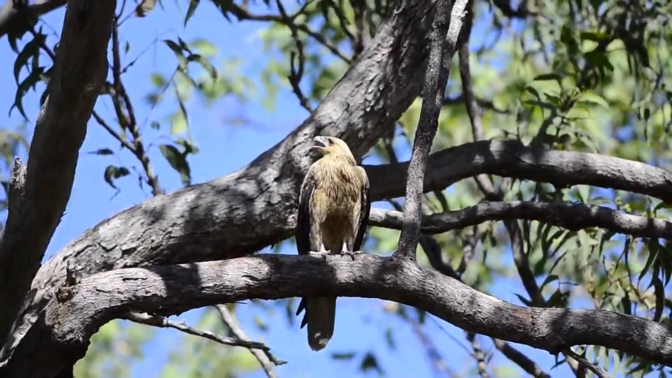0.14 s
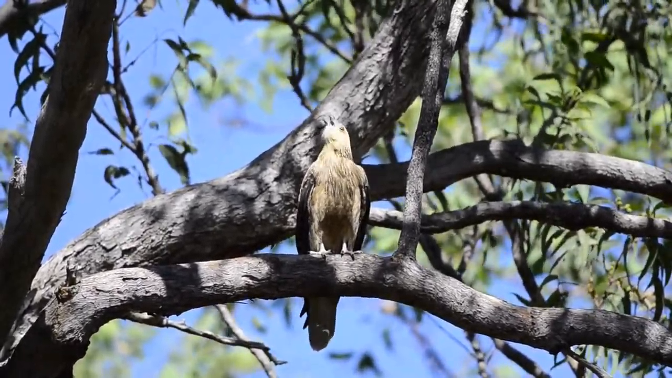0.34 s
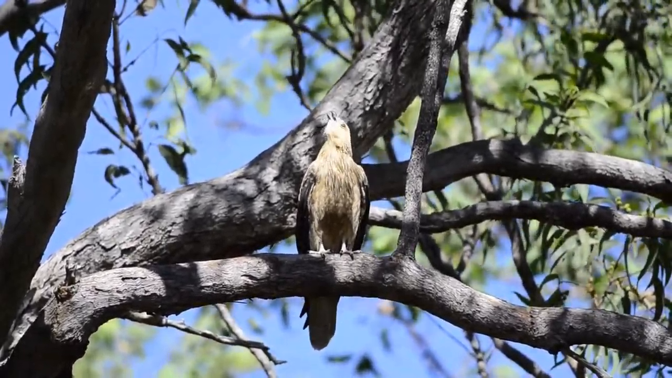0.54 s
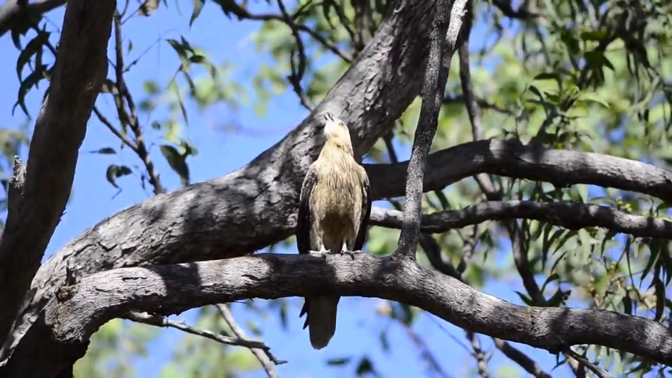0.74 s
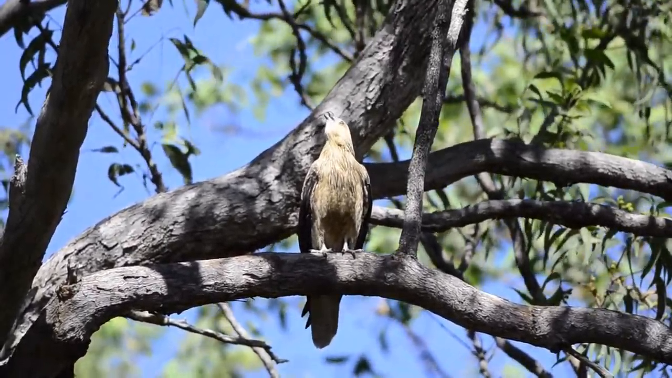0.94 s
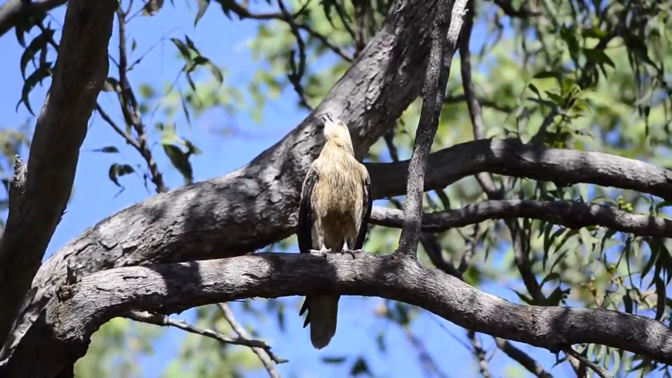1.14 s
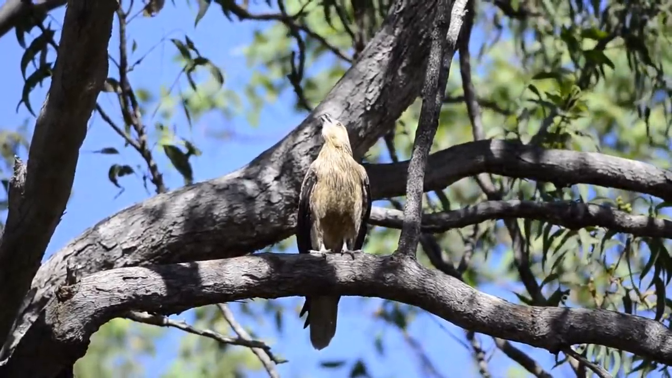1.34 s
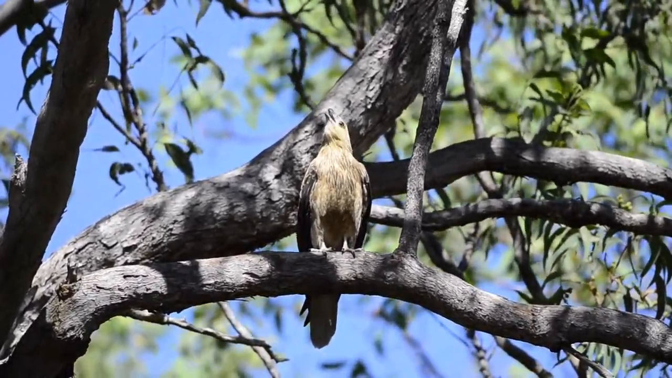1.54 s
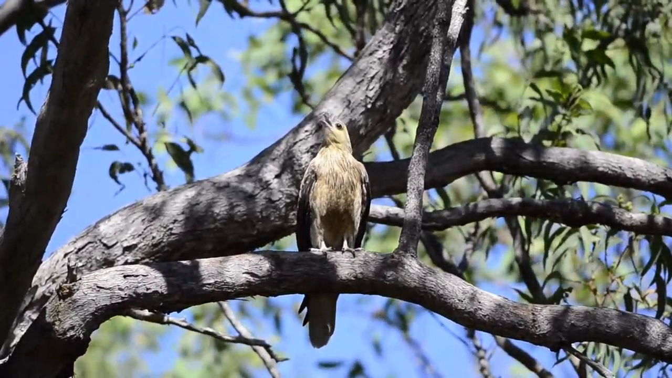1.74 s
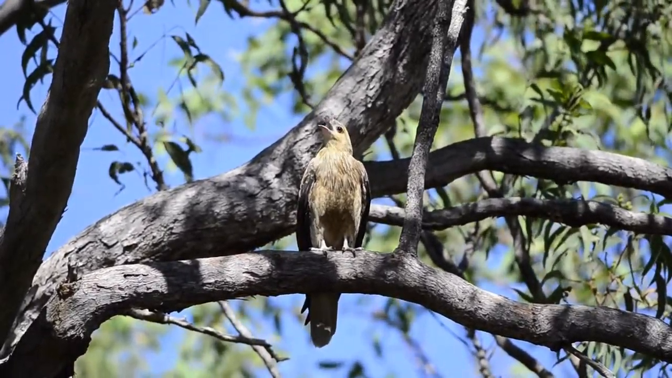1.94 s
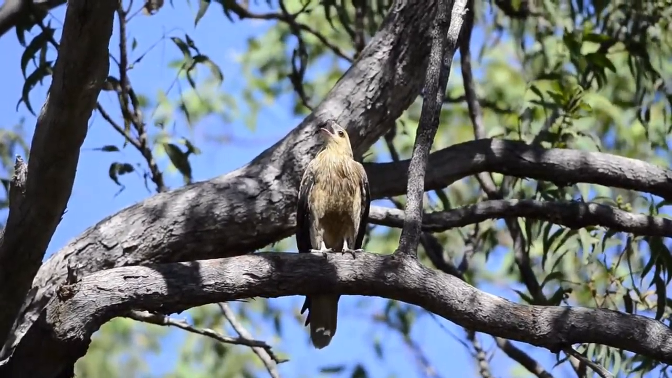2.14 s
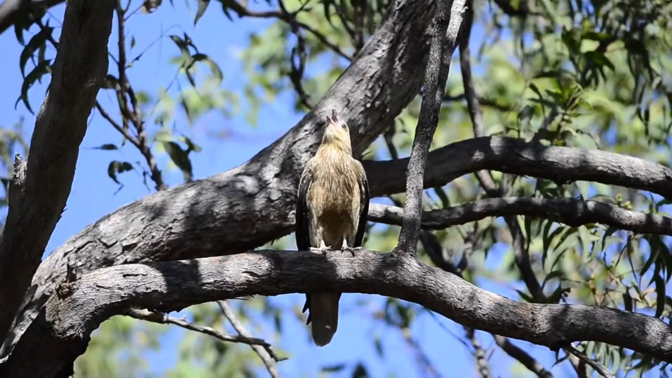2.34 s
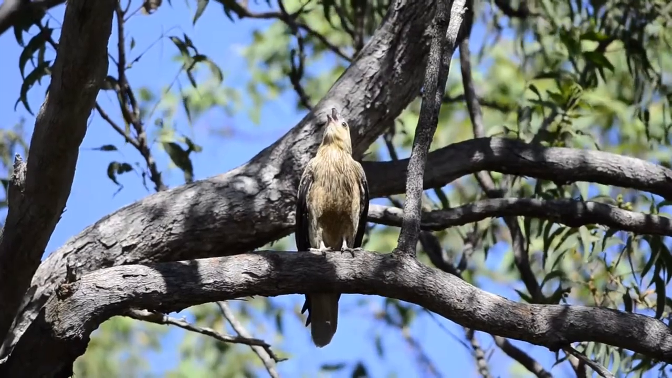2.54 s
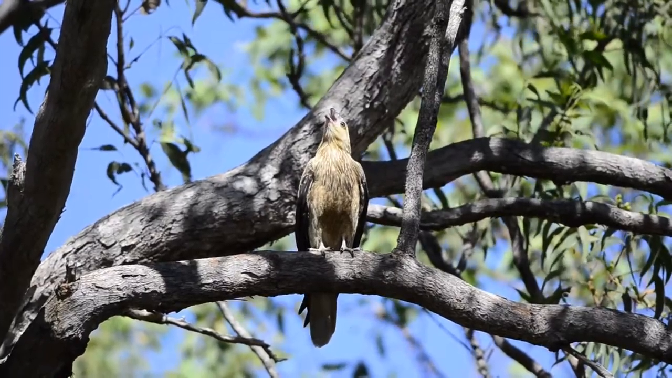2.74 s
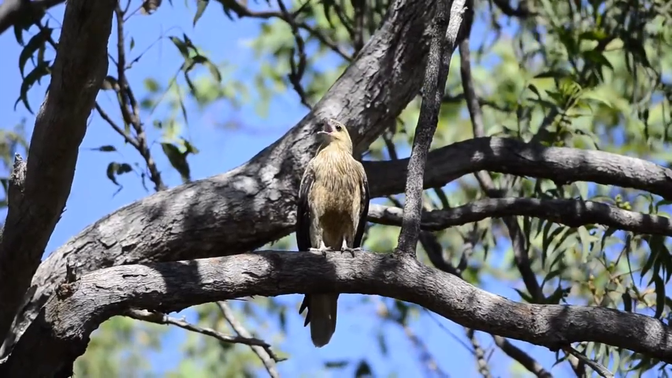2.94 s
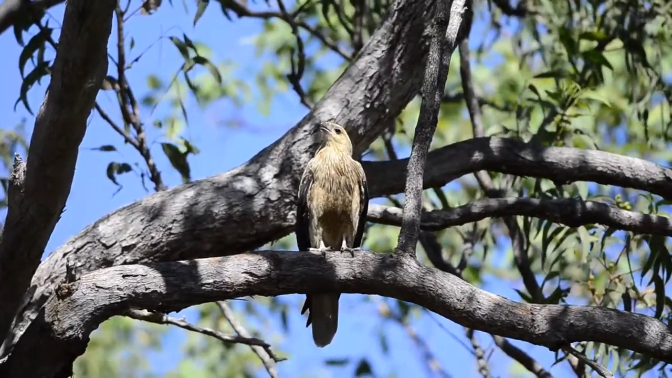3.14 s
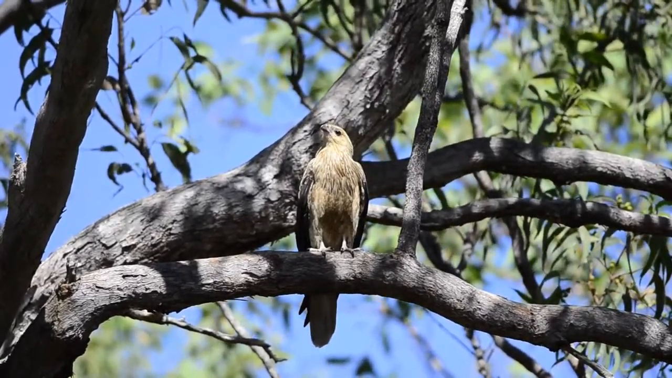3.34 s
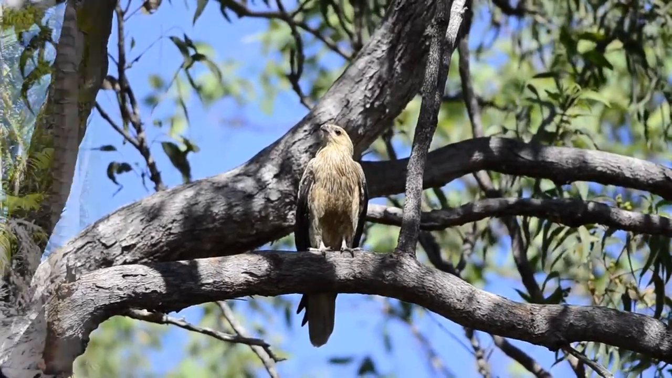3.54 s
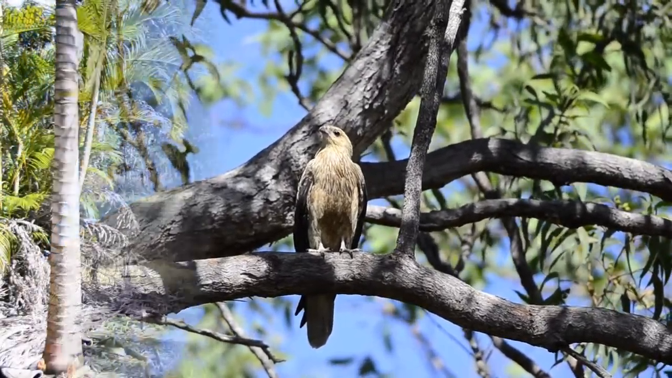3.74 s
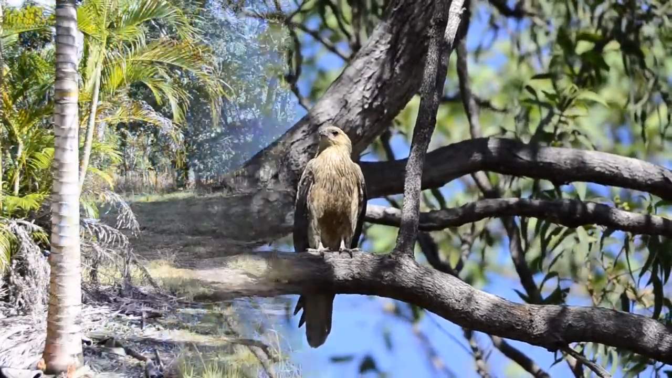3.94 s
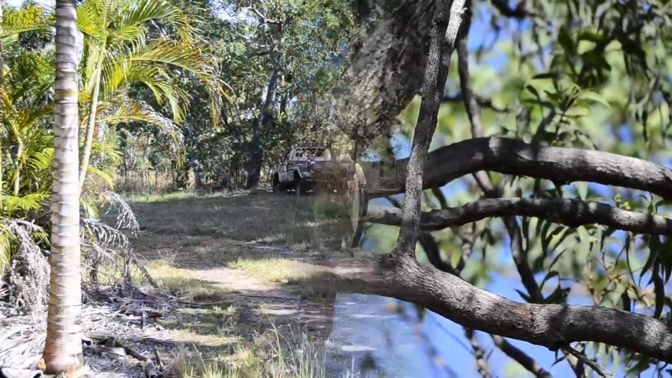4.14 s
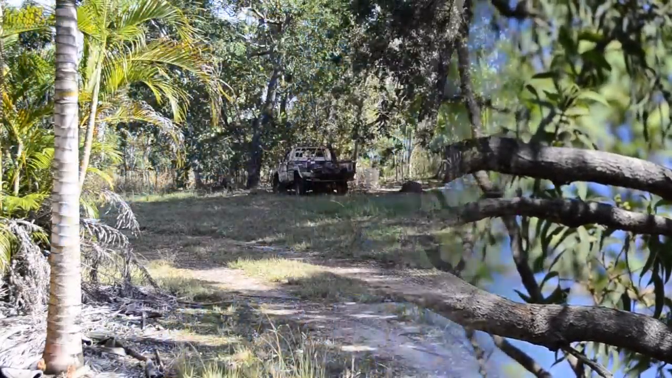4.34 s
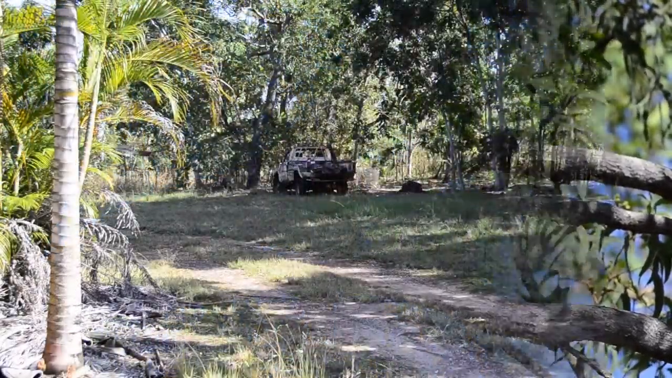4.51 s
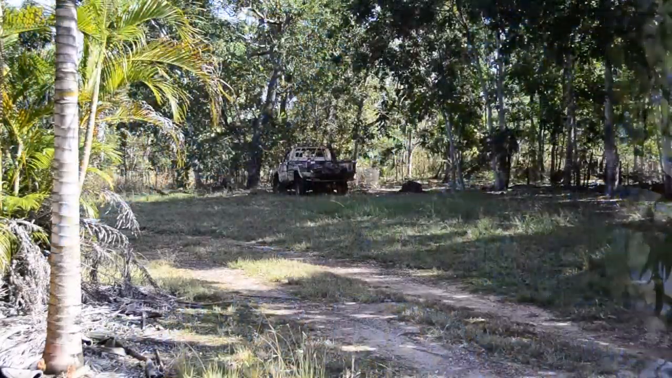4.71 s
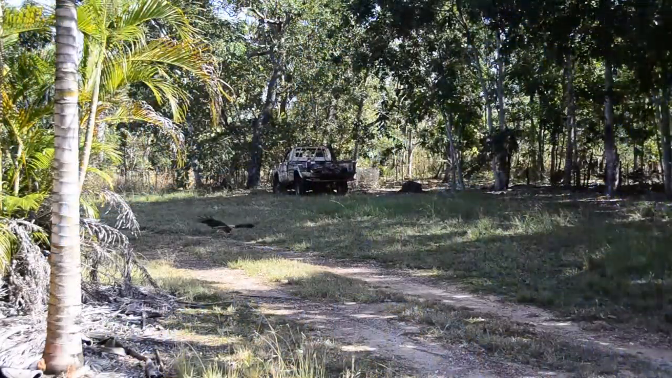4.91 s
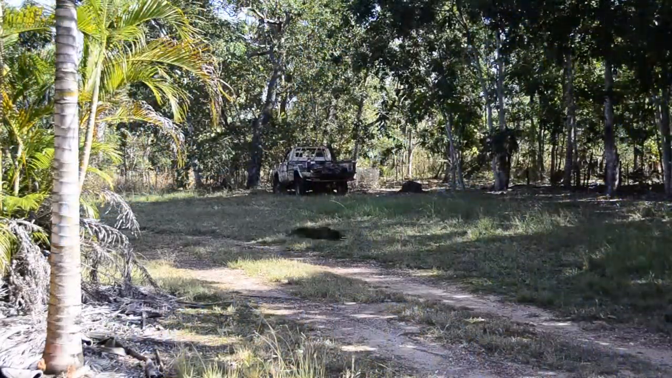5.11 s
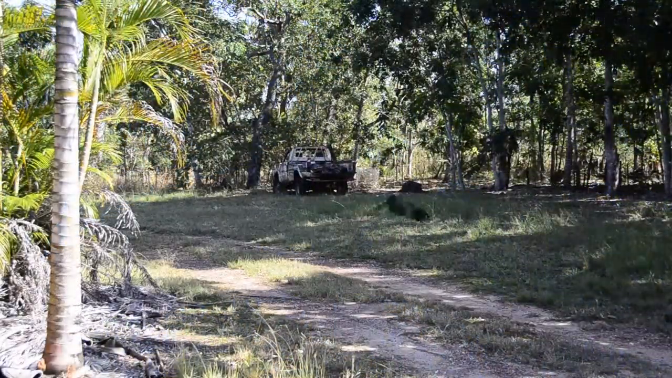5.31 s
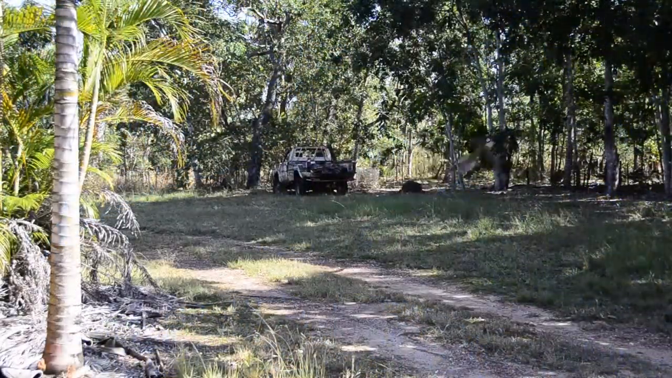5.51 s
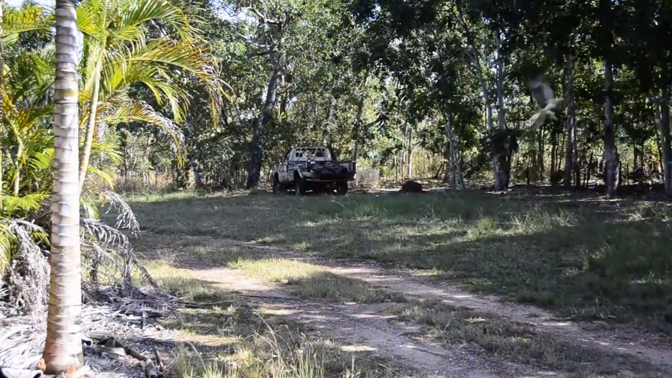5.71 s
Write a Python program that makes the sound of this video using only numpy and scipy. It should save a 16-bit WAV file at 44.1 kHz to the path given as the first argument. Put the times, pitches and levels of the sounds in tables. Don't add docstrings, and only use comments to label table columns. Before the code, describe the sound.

A quiet outdoor bush setting: soft, dull leaf rush, a barely noticeable distant engine hum and a thin high cicada buzz throbbing about seven times a second. At 0.24 s a kite calls loudly, leaping to a piercing peak, sliding down, then dropping at 0.63 s into a lower held note that fades by 1 s. From 1.2 to 2.2 s come seven short notes: two low hoots, three rough chirps that crack upward, and two higher arched notes. At 2.25 s a second, shorter falling whistle, raspier, leads into four quick climbing, breaking notes from 2.67 s and a sharp closing chip near 3.1 s. Trees answer with a short scattered echo. Then the bush is calm: a faint high peep at 3.8 s, a longer one at 5 s, twig ticks and rustle from 5.1 s, a stronger snap at 5.37 s, soft wing swishes at 5.3, 5.5 and 5.75 s, and a low faint coo near 5.6 s.

```python
import sys
import numpy as np
from scipy import signal
from scipy.fft import rfft, irfft, next_fast_len
from scipy.io import wavfile
from scipy.ndimage import uniform_filter1d, map_coordinates

SR = 44100
rng = np.random.default_rng(int(sys.argv[2]) if len(sys.argv) > 2 else 0)


def materialize(psi):
    bounded = np.clip(np.atleast_2d(psi).T, -1, 1)
    quanta = np.round(bounded * 32767).astype(np.int16)
    wavfile.write(sys.argv[1], SR, quanta)


def gain_from_decibels(decibels):
    exponent = np.asarray(decibels, float) / 20
    return 10 ** exponent


N = 254456
T = np.arange(N) / SR


def unit(x):
    return x / np.sqrt(np.mean(x ** 2) + 1e-20)


def along(points, hz):
    f, v = np.transpose(points)
    return np.interp(np.log(hz + 1), np.log(f + 1), v)


def curves(rows, t=T):
    s, *cols = np.transpose(rows)
    return [np.interp(t, s, c) for c in cols]


def wobble(rate):
    knots = rng.standard_normal(int(N * rate / SR) + 4)
    return unit(map_coordinates(knots, [T * rate]))


def filtered(x, response):
    m = next_fast_len(len(x) + 8192)
    gain = response(np.fft.rfftfreq(m, 1 / SR))
    return irfft(rfft(x, m) * gain, m)[:len(x)]


def hump(n, hz, width_hz):
    noise = rng.standard_normal(n)
    return unit(filtered(noise, lambda f: 1 / (1 + ((f - hz) / width_hz) ** 2) ** 2))


# [t/s, level/dB]
BUSH_LEVEL = [(0.0, -59), (1.7, -59), (3.26, -58), (4.56, -61.5), (4.82, -61.5), (5.77, -63)]
# [t/s, level/dB]
LEAF_LULL = [(4.88, 4.5), (4.92, 1), (5.08, 4.5), (5.09, 4)]
# [f/Hz, level/dB per Hz]
RUSH_COLOUR = [(15, -53), (25, -16), (79, -4.5), (133, -5), (359, -2.5), (457, -3.5), (666, -2.5),
               (1340, -7), (2560, -9), (5010, -17.5), (5730, -22), (7300, -9.5), (8130, -23),
               (12200, -38.5), (15500, -62)]
# [f/Hz, width/Hz, level/dB]
ENGINE_LINES = [(88, 4.7, -73), (370.5, 19, -67.5)]


def bush():
    rush = unit(filtered(rng.standard_normal(N), lambda f: gain_from_decibels(along(RUSH_COLOUR, f))))
    hum = sum(gain_from_decibels(db + 1.5 * wobble(3)) * hump(N, hz, width) for hz, width, db in ENGINE_LINES)
    swell = gain_from_decibels(curves(BUSH_LEVEL)[0] + 0.97 * wobble(3.0))
    return swell * (gain_from_decibels(-1.93 + curves(LEAF_LULL)[0]) * rush + gain_from_decibels(57) * hum)


# [t/s, level/dB]
CHORUS_LEVEL = [(0.0, -66.5), (5.77, -73)]


def cicadas():
    cycle = 2 * np.pi * 7.27 * (T - 4.25) + .15 * wobble(1.5)
    chorus = gain_from_decibels(-9) * hump(N, 7350, 450)
    # f/Hz, width/Hz, lead/rad
    for hz, width_hz, lead in [(7600, 240, .45), (7230, 280, -.4)]:
        throb = (.5 + .5 * np.cos(cycle + lead)) ** 2.2
        chorus += gain_from_decibels(3 + 1.8 * wobble(5)) * throb * hump(N, hz, width_hz)
    return gain_from_decibels(curves(CHORUS_LEVEL)[0]) * chorus


# [t/s, length/s, level/dB, centre f/Hz]
PUFFS = [(0.24, 0.011, -35.5, 3300), (0.979, 0.065, -45.5, 2200), (1.221, 0.03, -37.5, 2137),
         (1.39, 0.019, -40, 2300), (1.578, 0.0083, -39, 2400), (1.597, 0.042, -51.5, 2500),
         (1.743, 0.034, -42.5, 2200), (1.788, 0.013, -53.5, 2400), (1.905, 0.046, -40.5, 2400),
         (1.945, 0.058, -46, 2600), (2.037, 0.025, -41, 2800), (2.163, 0.0061, -32.5, 2800),
         (2.244, 0.018, -37, 3000), (2.755, 0.0063, -37, 2200), (2.867, 0.012, -37.5, 2600),
         (2.963, 0.042, -41, 2600), (3.071, 0.0065, -33.5, 2600), (3.158, 0.032, -42, 2400)]


def rasps():
    out = np.zeros(N)
    for s, length, db, hz in PUFFS:
        n = round(length * SR)
        puff = hump(n, hz, 740)
        puff = puff + gain_from_decibels(-17.0) * hump(n, 1.47 * hz, 1200)
        puff = puff + gain_from_decibels(-30.5) * hump(n, 3.67 * hz, 1400)
        swell = np.sin(np.pi * (np.arange(n) / n) ** .7) ** .6
        out[round(s * SR):][:n] += gain_from_decibels(db) * puff * swell
    return out


# [t/s, pitch f/Hz, level/dB, second membrane level/dB]
LONG_NOTES = [
    ("lead", [(0.242, 2170, -51.5, 3.5), (0.25, 2726, -38, -15.5), (0.262, 2985, -23.5, -42), (0.281, 3214, -24, -18.5)]),
    ("fall", [(0.281, 3552, -17.5, -32), (0.295, 3382, -22, -28.5), (0.31, 3083, -27, -30), (0.327, 2780, -28, -14), (0.345, 2640, -33, -20.5), (0.41, 2385, -31.5, -41.5), (0.5, 2267, -35, -43), (0.57, 2130, -28, -35), (0.627, 2038, -36, -18.5)]),
    ("hold", [(0.628, 1694, -40, -14), (0.66, 1654, -34.5, -31), (0.72, 1658, -36, -20.5), (0.8, 1632, -35.5, -24.5), (0.88, 1618, -34, -22), (1.0, 1585, -47.5, -10)]),
              ("lead", [(2.25, 2406, -45.5, -27), (2.26, 2656, -28, -23), (2.272, 2740, -31.5, -22)]),
    ("split", [(2.272, 3296, -24.5, -17), (2.288, 3155, -20.5, -25), (2.31, 2860, -27.5, -23), (2.34, 2773, -33, -15.5), (2.4, 2616, -26.5, -27.5), (2.47, 2512, -35.5, -21.5), (2.53, 2528, -32, -20.5), (2.59, 2508, -33.5, -21), (2.666, 2270, -32, -16.5)]),
]
# [t/s, pitch f/Hz, level/dB, second membrane level/dB]
CLOSING_NOTE = [
    ("arch", [(3.068, 2304, -32, -24), (3.078, 2568, -31.5, -38), (3.092, 2655, -27.5, -45), (3.103, 2400, -37.5, -30), (3.116, 2060, -34.5, -16)]),
]


def long_whistles():
    for voice, rows in LONG_NOTES + CLOSING_NOTE:
        cut = span(rows[0][0], rows[-1][0])[0]
        yield (voice, cut, *curves(rows, T[cut]))


CATCH_DB, CATCH_S = -12, 0.0053
CALM_DB = -45


def span(start, end):
    cut = slice(round(start * SR), round(end * SR))
    u = (T[cut] - start) / (end - start)
    return cut, u, np.exp(-np.minimum(u, 1 - u) * (end - start) / CATCH_S)


# [start t/s, end t/s, first f/Hz, top f/Hz, level/dB]
ARCHED = [
    (1.235, 1.313, 1690, 1807, -31.5),
    (1.406, 1.479, 1710, 1848, -31),
    (2.05, 2.112, 2117, 2256, -29),
    (2.165, 2.224, 2295, 2562, -28),
]


def arched_notes():
    for start, end, first_hz, top_hz, db in ARCHED:
        cut, u, catch = span(start, end)
        voice, top = ("hoot", .47) if top_hz < 2000 else ("arch", 0.345)
        up, down = np.clip(1 - u / top, 0, 1), np.clip((u - top) / (1 - top), 0, 1)
        hz = top_hz - (top_hz - first_hz) * (up ** 2.0 + 1.88 * down ** 1.5)
        level_db = db + np.interp(u, [0, 0.54, 1], [-8.5, 0, -10])
        yield voice, cut, hz, level_db, CALM_DB + (CATCH_DB - CALM_DB) * catch


# [start t/s, break t/s, first f/Hz, last f/Hz, level at break/dB]
CLIMBING = [(1.587, 1.612, 1762, 1962, -24.5), (1.749, 1.772, 1810, 2076, -27.5),
            (1.909, 1.928, 1975, 2193, -25), (2.667, 2.695, 1788, 2184, -27.5),
            (2.771, 2.791, 1865, 2237, -26.5), (2.87, 2.896, 1986, 2495, -26),
            (2.968, 2.995, 2130, 2686, -24)]
# [end t/s, first f/Hz, last f/Hz, level/dB, second membrane level/dB]
AFTER_BREAK = [(1.669, 2269, 2012, -31.5, -7.5), (1.836, 2432, 2250, -32, -7),
               (1.986, 2572, 2415, -29, -16), (2.742, 2435, 2405, -37, -16),
               (2.834, 2523, 2366, -35.5, -24.5), (2.931, 2726, 2380, -33, -20),
               (3.03, 2986, 2610, -28.5, -27.5)]


def climbing_notes():
    for climb, after in zip(CLIMBING, AFTER_BREAK):
        start, snap, first_hz, last_hz, db = climb
        end, high_hz, low_hz, high_db, second_db = after

        cut, u, catch = span(start, snap)
        bend = (2038 / first_hz) ** 5
        hz = first_hz + (last_hz - first_hz) * np.abs(u) ** bend
        level_db = db - 18.5 * np.abs(1 - u) ** 0.91
        yield "climb", cut, hz, level_db, CALM_DB + (CATCH_DB - CALM_DB) * catch

        cut, u, catch = span(snap, end)
        hz = high_hz + (low_hz - high_hz) * np.abs(u) ** 2.1
        voice, jolt_db = ("rough", -4.5) if snap < 2.0 else ("broken", 3.5)
        level_db = high_db - 6 * u + jolt_db * np.exp(-u * (end - snap) / 0.0079)
        yield voice, cut, hz, level_db, second_db + (CATCH_DB - second_db) * catch


def stretches():
    yield from long_whistles()
    yield from arched_notes()
    yield from climbing_notes()


PRESSED_VOICES = ["fall", "split", "rough", "broken"]
# [f/Hz, level/dB]
OCTAVE_OPEN = [(3300, -17.5), (3700, -17), (4400, -9), (5100, -8), (6000, -11), (6500, -14.5)]
OCTAVE_PRESSED = [(4200, -40), (4700, -35), (5400, -32.5), (5900, -22.5), (6400, -18.5), (7000, -19.5)]
# [f/Hz, level/dB]
THIRD_OVERTONE = [(4900, -34.5), (5500, -33), (6300, -26.5), (6800, -14.5), (7700, -21.5), (8800, -26),
                  (9800, -41), (10600, -53)]
# [f/Hz, level/dB]
UPPER_OVERTONES = [(5000, -35), (6500, -16), (8500, -29), (10500, -39), (12500, -61.5), (15000, -79.5)]
EVEN_OVERTONES = {"fall": -21, "split": -3, "rough": 0, "broken": 0, "hold": -4}
WEARING_DULL = {"arch": -9, "hoot": -7, "climb": -14, "broken": -11.5, "rough": -8.5}


def overtone_levels(voice, v, hz, db1, bright_db):
    worn = np.arange(len(hz)) / len(hz)
    dim_db = WEARING_DULL.get(voice, 0) * worn ** 2
    octave = OCTAVE_PRESSED if voice in PRESSED_VOICES else OCTAVE_OPEN
    levels = [db1,
              dim_db + db1 + v["octave_db"] + along(octave, 2 * hz),
              dim_db + db1 + v["twelfth_db"] + along(THIRD_OVERTONE, 3 * hz)]
    for k in (4, 5, 6, 7):
        db = db1 + dim_db + v["upper_db"] + bright_db + along(UPPER_OVERTONES, k * hz)
        if k % 2 == 0:
            db = db + EVEN_OVERTONES.get(voice, 0)
        levels.append(db - 90 * (k * hz > 16000))
    return levels


def membrane_lines(k, phase, beat, second_db, v):
    sum_share = 0 if k == 1 else (2 / k) ** 1.1
    below_db = np.minimum(second_db + sum_share * v["sum_db"], 8)
    above_db = second_db + v["mirror_db"] + (k > 2) * 0.25 * v["sum_db"]
    mixed = gain_from_decibels(below_db) * np.sin(phase - beat) + gain_from_decibels(above_db) * np.sin(phase + beat)
    second_order = np.sin(phase - 2 * beat) + gain_from_decibels(-3) * (k == 1) * np.sin(phase - 3 * beat)
    return mixed + gain_from_decibels(below_db + second_db - 1.5) * second_order


REGISTERS = { "lead": dict(octave_db=2, twelfth_db=3, upper_db=-3, mirror_db=-4.5, sum_db=4, loose=0.059, hoarse=.12, stack=.05),
             "fall": dict(octave_db=0, twelfth_db=-1, upper_db=1, mirror_db=-4.5, sum_db=-1.5, loose=0.022, hoarse=0.067, stack=.01),
             "hold": dict(octave_db=-2, twelfth_db=-4, upper_db=.5, mirror_db=-16, sum_db=-0.5, loose=0.061, hoarse=.02, stack=0.014),
             "split": dict(octave_db=4, twelfth_db=-2.5, upper_db=-1, mirror_db=-5, sum_db=18.5, loose=0.025, hoarse=0.12, stack=.05),
             "arch": dict(octave_db=3, twelfth_db=7, upper_db=-5.5, mirror_db=-3.5, sum_db=0.5, loose=0.13, hoarse=0.046, stack=.03),
             "hoot": dict(octave_db=5, twelfth_db=2, upper_db=-2.5, mirror_db=2, sum_db=1.5, loose=.12, hoarse=.05, stack=.02),
             "climb": dict(octave_db=5, twelfth_db=4.5, upper_db=-1.5, mirror_db=-5.5, sum_db=4, loose=0.019, hoarse=0.12, stack=0.036),
             "rough": dict(octave_db=10, twelfth_db=-9, upper_db=-0.5, mirror_db=-6.5, sum_db=24.5, loose=0.058, hoarse=0.1, stack=0.27),
             "broken": dict(octave_db=10, twelfth_db=-4, upper_db=1.5, mirror_db=-8, sum_db=20, loose=0.14, hoarse=0.23, stack=0.091),
             }
# [t/s, brightness level/dB]
BEAK_GAPE = [(.25, -2.5), (.33, 8), (.62, -15.5), (.64, -18), (1.0, -9), (1.25, -1.5), (1.6, -0.5),
             (1.8, 5), (1.95, 5.5), (2.07, 0), (2.2, 3), (2.27, -4.5), (2.45, 3), (2.65, 5), (2.9, 3.5),
             (3.1, 11)]
CYCLE_GRIT = {"rough": .22, "broken": .22, "split": .06}


def whistle():
    out = np.zeros(N)
    bright_db, = curves(BEAK_GAPE)
    grit = wobble(500)
    tremor = 1 + .0015 * wobble(150)
    slack, scatter, shiver = wobble(120), wobble(60), wobble(900)
    for voice, cut, hz, db1, second_db in stretches():
        v, t = REGISTERS[voice], T[cut]
        steady_hz = uniform_filter1d(hz, size=260, mode="nearest")
        turn = 2 * np.pi * np.cumsum(steady_hz * tremor[cut]) / SR
        drift = 2 * np.pi * np.cumsum(hz * v["loose"] * slack[cut]) / SR
        lock = -.42 if voice == "hold" else 1 / 4
        beat = lock * (turn + drift)
        tone = 0
        for k, db in enumerate(overtone_levels(voice, v, hz, db1, bright_db[cut]), 1):
            blur = (k - .8) * v["hoarse"] * shiver[cut]
            tug = (k - .6) ** 0.98 * v["stack"] * np.sin(beat)
            phase = k * turn + blur + tug
            tone = tone + gain_from_decibels(db) * (np.sin(phase) + membrane_lines(k, phase, beat, second_db, v))
        gate = np.clip(np.minimum(t - t[0], t[-1] - t) / 0.0024, 0, 1)
        unsteady = gain_from_decibels((.5 + 14 * v["hoarse"]) * scatter[cut])
        rough = 1 + CYCLE_GRIT.get(voice, 0) * grit[cut]
        out[cut] += np.sqrt(2) * gate * unsteady * rough * tone
    return gain_from_decibels(2.0) * out


def beak(x):
    return filtered(x, lambda f: 1 / np.sqrt(1 + (1450 / (f + 1)) ** 10))


# [f/Hz, t60/s, level/dB]
TREE_TAIL = [(1500, 0.46, -6), (2500, 0.73, -5.5), (4000, 0.44, -5.5), (6500, 0.45, -1),
             (10100, 0.14, -2.5)]
# [delay t/s, level/dB]
TRUNK_ECHOES = [(.012, -8), (.031, -20.5), (.072, -27.5), (.11, -25)]


def trees(x):
    hz, t, z = signal.stft(rng.standard_normal(SR), SR, nperseg=256)
    band_hz, t60, level_db = np.transpose(TREE_TAIL)
    t60 = along(np.c_[band_hz, t60], hz)[:, None]
    level_db = along(np.c_[band_hz, level_db], hz)[:, None]
    decay = gain_from_decibels(level_db - 60 * t / t60) / np.sqrt(t60 * SR / np.log(1e6))
    tail = signal.istft(z * decay, SR, nperseg=256)[1]
    for delay, db in TRUNK_ECHOES:
        tail[round(delay * SR):][:300] += gain_from_decibels(db) * rng.standard_normal(300) / np.sqrt(300)
    return signal.fftconvolve(np.pad(x, (150, 0)), tail)[:N]


# [t/s, length/s, from f/Hz, to f/Hz, level/dB]
FAR_PEEPS = [
    (3.764, 0.047, 3750, 4050, -62),
    (4.995, 0.157, 2546, 2600, -67.5),
    (5.578, 0.063, 646, 672, -56),
    (5.65, 0.011, 690, 730, -56),
]


def peeps():
    out = np.zeros(N)
    for s, length, from_hz, to_hz, db in FAR_PEEPS:
        u = np.arange(round(length * SR)) / (length * SR)
        turn = 2 * np.pi * np.cumsum(from_hz + (to_hz - from_hz) * u) / SR
        glide = np.sin(turn + 0.48 * wobble(210)[:len(u)])
        out[round(s * SR):][:len(u)] += gain_from_decibels(db) * np.sin(np.pi * u) * glide
    return out


# [t/s, decay t60/s, level/dB, low f/Hz, high f/Hz]
HISS_AND_SNAPS = [(5.086, 5.5, -65, 3530, 10800), (5.088, 0.27, -53, 349, 11160),
                  (5.152, 0.037, -71, 2000, 6940), (5.185, 0.037, -57, 2000, 6050),
                  (5.108, .05, -55, 900, 5000), (5.13, .05, -60, 1500, 6000), (5.365, 0.054, -45.5, 294, 5200),
                  (5.37, 0.1, -56, 300, 1190), (5.376, 0.11, -55, 1810, 3030), (5.55, 0.15, -58.5, 1200, 2970),
                  (5.595, 0.11, -57, 1000, 2500)]
# [t/s, level/dB]
WING_BEATS = [
    (5.27, -60.5),
    (5.51, -59.5),
    (5.75, -58.5),
]


def wings():
    out = np.zeros(N + SR)
    t = T[:SR]
    rows = [(0.00084, *row) for row in HISS_AND_SNAPS]
    rows += [(0.0138, s, 0.3, db, 4300, 9500) for s, db in WING_BEATS]
    for rise, s, t60, db, low_hz, high_hz in rows:
        def band(f):
            edges = 1 / (1 + (low_hz / (f + 1)) ** 2) / (1 + (f / high_hz) ** 5)
            return edges / np.sqrt(1 + f / 3000) / (1 + (f / 12000) ** 10)

        swish = unit(filtered(rng.standard_normal(len(t)), band))
        out[round(s * SR):][:len(t)] += gain_from_decibels(db - 60 * t / t60) * (1 - np.exp(-t / rise)) * swish
    return out[:N]


def scene():
    kite = beak(whistle() + rasps())
    return (bush() + cicadas() + kite + trees(kite) + peeps() + wings())[None]


# [f/Hz, width/Hz, depth 0-1]
HOUSING_DIPS = [(5756, 210, 0.52), (6860, 370, 0.46)]


def housing(x):
    def dips(f):
        gains = [1 - min(depth, .95) / (1 + ((f - hz) / width) ** 2) for hz, width, depth in HOUSING_DIPS]
        return np.prod(gains, axis=0)

    return filtered(x, dips)


def top_cut(x):
    return signal.sosfilt(signal.butter(12, 15680, fs=SR, output="sos"), x)


def record(dry):
    mix = housing(dry[0])[None]
    return top_cut(mix)


dry = scene()
out = record(dry)
materialize(out)
```